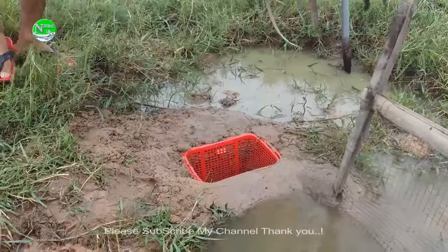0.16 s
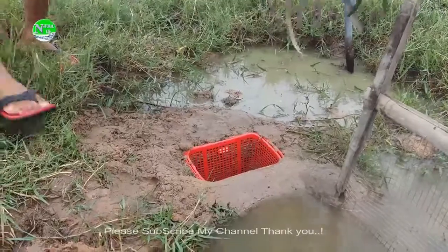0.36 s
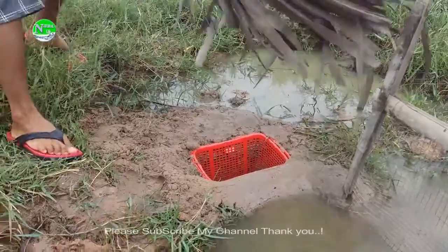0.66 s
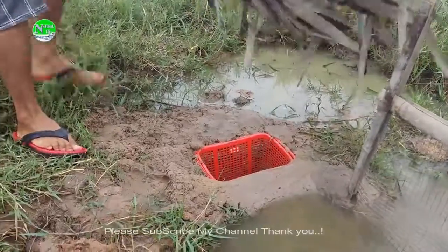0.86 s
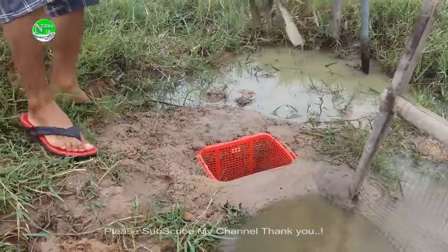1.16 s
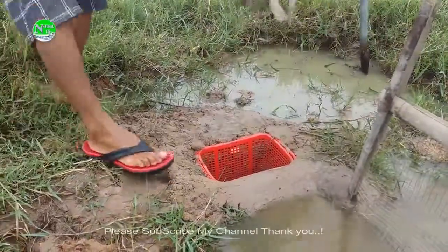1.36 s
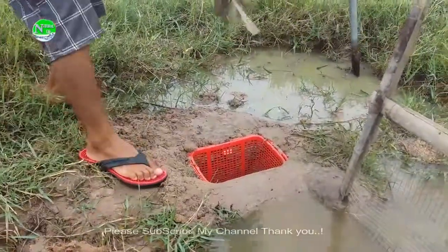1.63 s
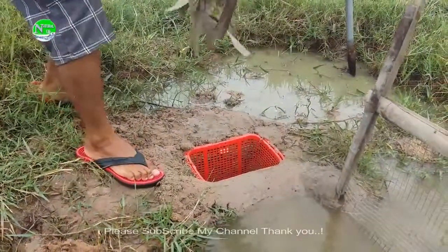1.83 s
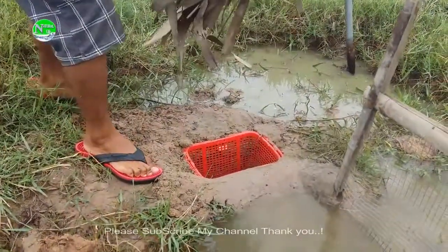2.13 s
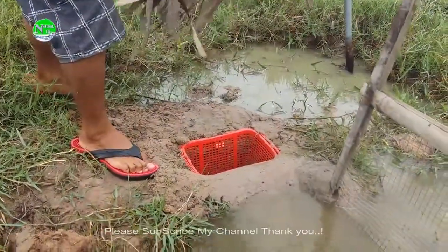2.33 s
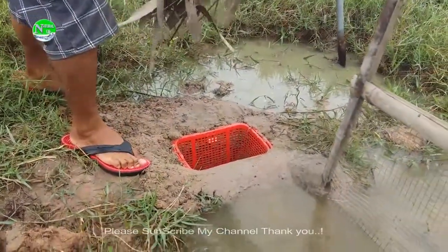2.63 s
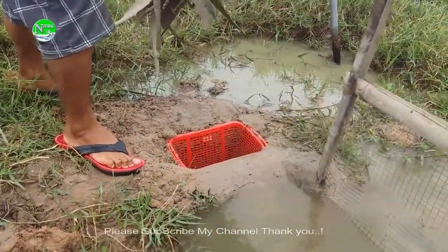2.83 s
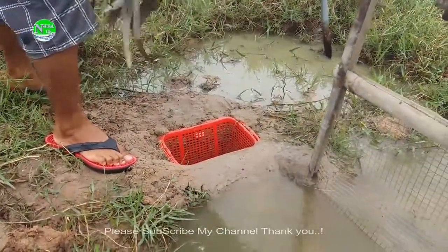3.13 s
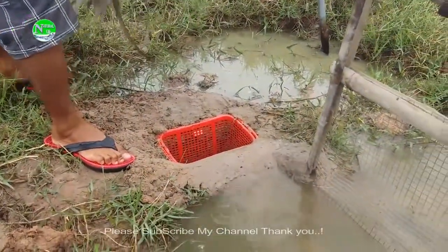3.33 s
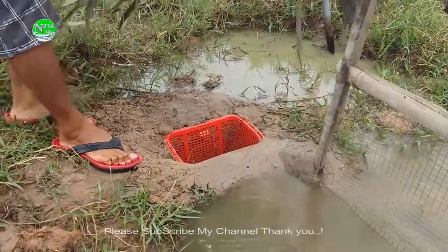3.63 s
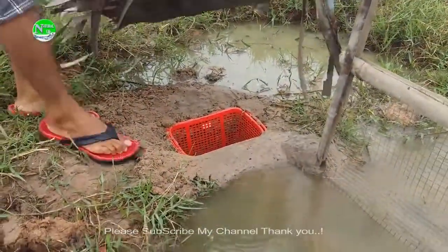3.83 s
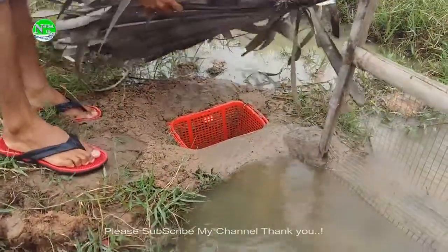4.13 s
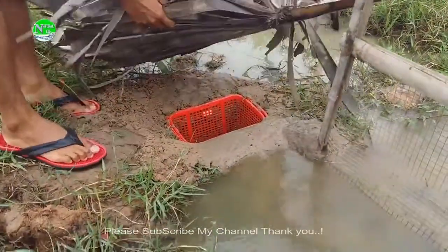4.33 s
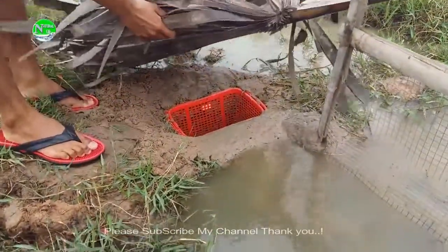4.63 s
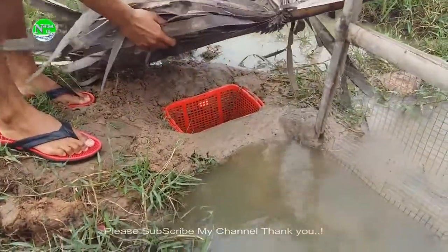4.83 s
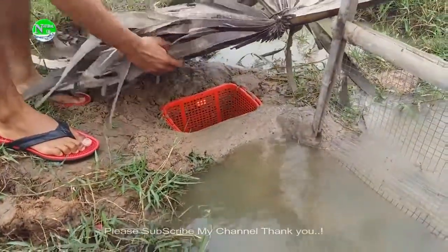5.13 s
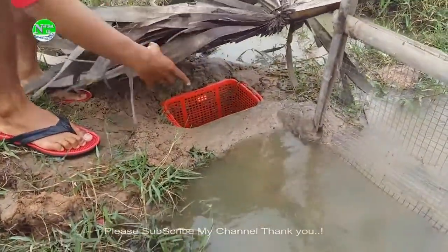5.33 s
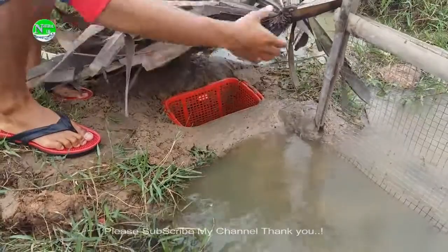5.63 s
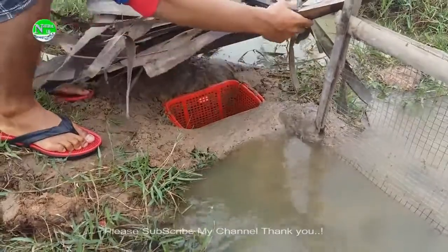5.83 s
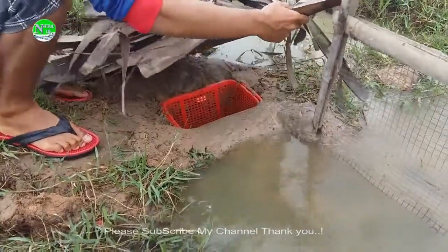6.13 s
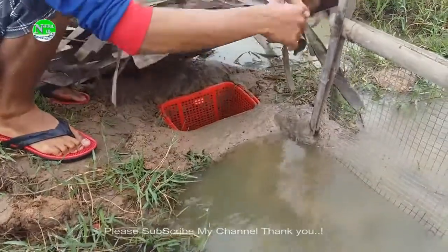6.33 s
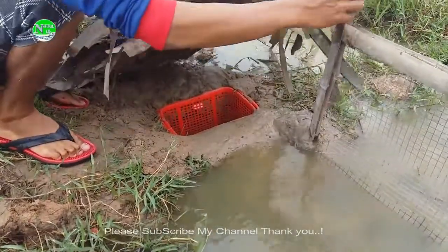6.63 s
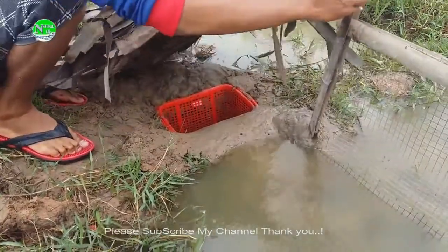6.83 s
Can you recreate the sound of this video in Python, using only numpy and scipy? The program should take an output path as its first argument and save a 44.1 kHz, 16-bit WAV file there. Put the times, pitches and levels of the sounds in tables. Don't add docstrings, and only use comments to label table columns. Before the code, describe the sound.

Close outdoor sound of stiff, dry fronds being handled by a ditch: grainy rubbing, hollow little leaflet pops, ripping fibres and needle-sharp snaps, strongest around two and a half and nearly four seconds. A few muffled footfalls come first. Later strokes grow weak and separate, revealing high cricket buzzes and quick double ticks over faint air hiss and far traffic rumble. The compact microphone sounds bright and dry, with little low weight.

```python
import sys
import numpy as np
from scipy import signal
from scipy.fft import rfft, irfft
from scipy.io import wavfile
from scipy.ndimage import uniform_filter1d

SR = 44100
rng = np.random.default_rng(int(sys.argv[2]) if len(sys.argv) > 2 else 0)


def boost(x):
    u = np.asarray(x, float) / 20
    return 10 ** u


def output_pcm(signal):
    pcm = np.clip(np.atleast_2d(signal).T, -1, 1) * 32767
    wavfile.write(sys.argv[1], SR, np.round(pcm).astype(np.int16))


N = 306936

# freq_hz, density_db_per_hz
LEAF_SPECTRUM = [(150, -83.5), (250, -10), (387, -15.5), (610, -10), (821, -12), (896, -10), (1510, -10),
                 (1680, -10.5), (1840, -10), (3210, -9), (4970, -1.5), (6030, 2.5), (8410, -14),
                 (15000, -25), (16450, -32)]
# time_s, level_db, hiss_re_level_db
CARRY_FRICTION = [(0, -50.5, -12), (.33, -51, -12), (.7, -41.5, -14), (1.13, -43, -10), (1.31, -48, -22),
                  (1.5, -41, -5), (1.78, -39.5, -31), (2.2, -41, -3.5), (2.56, -41, -14), (2.68, -52, -25),
                  (3.1, -45, -28), (3.3, -40, -19), (3.85, -44, -9), (4.08, -40.5, -5.5), (4.5, -51, -35),
                  (5.4, -47, -24), (5.6, -54.5, -50), (6.96, -53.5, -36)]
# start_s, hold_s, level_db, breadth_db (a crushing grip is both deeper and finer)
HAND_STROKES = [(0.374, 0.02, -45, -0.5), (0.412, 0.26, -38.5, 0.5), (1.38, 0.023, -35.5, 3.5),
                (1.441, 0.024, -36, 4.5), (1.535, 0.038, -30.5, -2.5), (1.624, 0.03, -34, -3),
                (1.958, 0.04, -36, -3), (2.2, 0.02, -40, -16), (2.226, 0.0055, -46, 0.5),
                (2.365, 0.011, -45.5, -0.5), (3.783, 0.022, -42, -4), (2.155, 0.053, -37.5, -4.5),
                (2.585, 0.051, -47, 0.5), (2.76, .02, -47.5, -3), (2.869, 0.014, -31.5, -2.5),
                (3.032, 0.025, -43, -4.5), (3.163, 0.046, -39, 2.5), (3.41, 0.034, -44.5, 2),
                (3.94, 0.016, -37.5, -5), (4.527, 0.021, -40, 1), (4.768, 0.035, -48.5, 4),
                (4.987, .13, -52, 4), (5.127, 0.01, -44, 6.5), (5.322, 0.023, -42.5, -5.5),
                (5.455, 0.0061, -39, -8.5), (5.937, 0.14, -44.5, -3.5), (6.071, 0.055, -42, -5.5),
                (6.275, 0.016, -47.5, -4), (6.446, 0.066, -47, -3), (6.75, 0.015, -69, 0),
                (6.857, 0.019, -56.5, -1)]
# time_s, left_re_right_db
FROND_PAN = [(0.0, -6), (1.2, -5.5), (3.43, -5.5), (3.91, -3.5), (4.11, -6.5), (5.18, -6.5), (5.23, -4.5),
             (5.7, -8.5), (5.95, -4.5), (6.34, -8), (6.4, -4), (6.59, -7), (6.77, -5), (6.96, -7)]
# time_s, cancelled_share (0-1)
MUD_DIP = [(0, 0.35), (1.8, 0.28), (2.0, 0), (2.6, 0.04), (2.7, 0.4), (3.2, 0), (6.96, 0.04)]
# click_s, peak_db, ring_hz, body_re_peak_db
CLEAN_BREAKS = [(.589, -16.5, 5800, -25), (1.2934, -23, 6340, -10.5), (1.702, -26, 5910, -7),
                (2.5279, -7, 5700, -21), (2.4371, -12.5, 5860, -27), (2.5159, -8.5, 6700, -45),
                (2.7801, -29.5, 6460, -12), (2.8841, -26, 5850, -14), (2.992, -24.5, 5800, -11.5),
                (3.3726, -19.5, 5720, -11), (3.6992, -13.5, 6260, -18), (3.7288, -8.5, 6850, -30),
                (3.8129, -12, 6500, -22), (3.884, -17.5, 6440, -24), (3.9016, -26, 6230, -29),
                (3.915, -9.5, 6530, -23), (3.936, -34, 6100, -26), (3.951, -13, 3900, -14),
                (4.0635, -16.5, 4640, -25), (5.105, -38.5, 3560, 7), (5.1252, -18, 5400, -29),
                (5.2855, -13, 6130, -48), (5.6059, -26, 6500, -5.5), (5.6664, -28, 7400, -10),
                (5.9968, -22, 5700, -11), (6.0116, -21.5, 5800, -13), (6.18, -30, 5600, -9.5),
                (3.9886, -12, 6700, -18.5), (4.0506, -18, 6160, -17), (3.5627, -22, 5670, -36),
                (3.8314, -13, 6340, -21)]
# click_s, peak_db
SMALL_CRACKS = [(1.968, -24), (1.9868, -23), (1.9927, -22), (2.0025, -27), (2.0712, -21), (2.072, -24),
                (2.1055, -16), (2.1087, -17), (2.1583, -15), (2.1614, -13), (2.1608, -16), (2.1632, -7),
                (2.1658, -11), (2.169, -13), (2.1716, -15), (2.2104, -22), (2.2139, -24), (2.219, -22),
                (2.3229, -23), (2.4428, -18), (2.4553, -21.5), (2.4903, -26), (2.5293, -16), (2.5314, -22),
                (2.5934, -24), (2.8675, -22), (2.8902, -21), (2.918, -23), (3.0416, -30), (3.2633, -25.5),
                (3.3767, -18.5), (3.4474, -27), (3.4495, -23), (3.455, -27), (3.8334, -14.5), (3.8353, -21),
                (3.9438, -29), (4.048, -23), (5.0575, -40), (5.5545, -38), (5.565, -40), (5.618, -33.5),
                (5.6422, -32), (5.9468, -28), (6.433, -36), (6.471, -32), (6.494, -31), (6.558, -37)]
# click_s, peak_db, ring_hz, body_re_peak_db
LONG_TEARS = [(.4063, -23.5, 5650, -36), (.4609, -26, 5700, -3), (1.2246, -29, 5960, -4.5),
              (1.3484, -30, 6300, 6.5), (1.8845, -24, 5960, -8), (1.9598, -20, 5800, -17),
              (1.9838, -21, 5550, -11), (2.021, -22, 6000, -34), (2.0447, -23.5, 6360, -32),
              (2.0689, -15.5, 6140, -45), (2.1024, -17, 5900, -18.5), (2.159, -14, 5670, -21),
              (2.1916, -32, 6100, -1), (2.2795, -25, 6200, -12), (2.304, -23, 6350, -25),
              (2.583, -17.5, 6900, -17), (2.6295, -22, 4800, -8), (2.7563, -25, 5240, -8.5),
              (2.8593, -24, 5100, -29), (2.8712, -15.5, 5240, -12.5), (2.9216, -17.5, 4960, -11),
              (3.0394, -33.5, 6440, 1), (3.258, -32, 5800, 1), (6.085, -27, 5900, -14),
              (6.447, -29.5, 6250, -38), (6.848, -49, 6100, 11.5)]
# click_s, peak_db, ring_hz, body_re_peak_db
RAGGED_SPLITS = [(.0388, -40.5, 4200, 6.5), (.1569, -28.5, 6740, -28), (1.405, -20, 6440, -31),
                 (2.146, -21, 5500, -26), (2.1644, -24, 5800, -7), (2.3517, -34, 6340, -4),
                 (3.4384, -17, 5250, -13), (3.384, -22.5, 5750, -23), (3.453, -21.5, 4620, -7),
                 (3.54, -27, 5800, -25), (3.835, -19, 6460, -18), (3.98, -24, 7200, -18),
                 (4.0168, -17.5, 6300, -27), (4.0733, -21.5, 6130, -28), (5.4184, -32.5, 5660, -5),
                 (5.483, -31.5, 5460, -3), (5.773, -44, 5400, -25), (5.95, -16.5, 3900, -25),
                 (6.2473, -38.5, 6130, -24), (6.639, -40, 5930, -25), (6.762, -30, 3850, -17)]
# t60_s, level_re_click_db
BREAK_TAIL = (.03, -25)
# t60_s, level_re_click_db
TEAR_TAIL = (0.051, 0.5)
# t60_s, level_re_click_db
SPLIT_TAIL = (0.023, -13.5)
# start_s, peak_db, ring_hz
LEAFLET_POPS = [(1.095, -27.5, 1810), (1.224, -29, 2190), (1.292, -31, 2190), (1.349, -21.5, 1580),
                (1.451, -17, 1980), (1.599, -29, 2120), (1.916, -27, 1600), (1.953, -20, 2440),
                (2.047, -23, 1810), (2.16, -20.5, 2710), (2.281, -29.5, 1070), (2.351, -22, 2680),
                (2.436, -32, 970), (2.527, -36, 580), (2.584, -27, 1830), (2.629, -27, 2200),
                (2.756, -34, 1170), (2.87, -24, 1810), (2.919, -22.5, 1040), (3.039, -25, 2440),
                (3.111, -35.5, 860), (3.16, -30, 1600), (3.195, -23.5, 1790), (3.31, -30, 2620),
                (3.372, -35, 2200), (3.437, -24.5, 1460), (3.914, -30, 2850), (3.95, -24, 2760),
                (4.046, -33, 1480), (5.603, -28.5, 2540)]
# start_s, peak_db, ring_hz
SOIL_TREADS = [
    (0.449, -33, 557),
    (.55, -40, 900),
    (.655, -29, 810),
    (.68, -31, 660),
    (.705, -35, 557),
    (.775, -33, 566),
    (.828, -30, 532),
    (.945, -36, 620),
    (5.885, -44, 666),
]
# start_s, length_s, end_level_db, pitch_hz
CRICKET_BUZZES = [
    (2.62, .14, -57.5, 7950),
    (3.29, .08, -53, 8000),
    (4.73, .123, -55.5, 8050),
    (4.96, .16, -58, 8000),
    (5.3, .13, -57.5, 8000),
    (5.585, .175, -57, 8000),
    (6.61, .15, -60, 7700),
    (6.87, .09, -59.5, 7700),
]
# start_s, peak_db, pitch_ratio
CRICKET_TICKS = [
    (4.2322, -27.5, 0.98),
    (4.6198, -27, 0.99),
    (4.9229, -27.5, 0.97),
    (5.457, -31, 0.96),
    (5.689, -31, 1),
    (6.287, -30.5, 0.94),
    (6.527, -31.5, 0.94),
]
# time_ms, pitch_hz, level_db
TICK_STROKE = [(0, 5900, -20), (.3, 6300, -3), (1.1, 7900, -6), (3.1, 6200, 0), (5.3, 7900, -5),
               (6.6, 7500, -4), (8.6, 8000, -10), (10, 8000, -30)]
# time_ms, pitch_hz, level_db
LEAD_STROKE = [(0, 5700, -14), (.3, 6200, -2), (.9, 7500, 0), (1.9, 8000, -3), (2.9, 8200, -22)]
# freq_hz, density_db_per_hz
TRAFFIC_SPECTRUM = [(12, -26), (20, -23), (27, -48), (39, -34), (49, -5.5), (70, -0.5), (97, -1.5),
                    (129, 0.5), (201, -5), (244, -11.5), (450, -25), (580, -42), (990, -120)]
# time_s, level_db
TRAFFIC_LEVEL = [(0.0, -42), (0.17, -48.5), (1.9, -46.5), (3.91, -47.5), (4.17, -43.5), (4.44, -47.5),
                 (6.96, -47)]
# freq_hz, density_db_per_hz
AIR_SPECTRUM = [(150, -24), (250, 2.5), (469, -8), (632, -2.5), (1600, -9), (2230, -4), (4400, -13),
                (6030, -9.5), (14500, -37), (16300, -53)]
# freq_hz, left_re_right_db
PORT_COLOUR = [(60, -1.5), (110, 0), (200, -1), (380, -1), (700, -0.5), (1290, -3), (2380, 0), (4400, 1),
               (8120, 2), (15000, 1.5)]

BODY_TOP_HZ, HISS_BOTTOM_HZ = 3200, 9000
RISE_DB_PER_S, FALL_DB_PER_S = 709, 311
STROKE_HISS_DB, HISS_PER_BREADTH = -22, 2.6
CARRY_BODY_DB = -2.5
DIP_HZ, DIP_WIDTH_HZ = 3900, 1400
PAN_TRIM_DB = 2.0
CRACK_HZ, CRACK_BODY_DB = 5900, -22
BREAK_HISS_DB, HISS_PER_BODY = -21, 0.2
POP_SHARPNESS, TREAD_SHARPNESS = 6.0, 2.5
BUZZ_WIDTH_HZ, TEETH_PER_S, BUZZ_SWELL_DB = 800, 195, 4
LEAD_S, LEAD_GAP_S, LEAD_DB = 0.0217, 0.0058, -6
AIR_DB = -56.5
CONVERTER_OFFSET = -0.0007


def rubbing(per_s, spread_db, clump_db, patchy_db, sharpness, lag_spread):
    size = boost(spread_db * np.minimum(rng.exponential(1, N), 4)) * rng.choice([-1, 1], N)
    slips = size * boost(clump_db * drift(33.0)) * (rng.random(N) < per_s / SR)
    pitches_hz = np.geomspace(330, 16000, 52)
    dealt = rng.integers(0, 52, N)
    lag_samples = (1.7 + lag_spread * drift(4.0)).astype(int)
    out = np.zeros((2, N))
    for k, offset in enumerate(rng.integers(0, N, 52)):
        hz = pitches_hz[k]
        width_hz = hz ** 1.172 / sharpness
        patch = ring(slips * (dealt == k), hz, width_hz) * boost(patchy_db * drift(8.8))
        out[0] += patch.take(np.arange(N) - np.roll(lag_samples, offset), mode="clip")
        out[1] += patch
    edges, body, hiss = three_ways(port_peak(colour(out, LEAF_SPECTRUM)))
    edges_gain, body_gain, hiss_gain = effort()
    dip = np.clip(in_time(MUD_DIP)[0], 0, 1)
    edges = edges - dip * ring(edges, DIP_HZ, DIP_WIDTH_HZ)
    body = body - dip * ring(body, DIP_HZ, DIP_WIDTH_HZ)
    pan = boost(np.outer([0.5, -0.5], in_time(FROND_PAN)[0] + PAN_TRIM_DB))
    upper = edges_gain * evened(edges, 0.11) * pan
    lower = boost(-2.0) * body_gain * evened(body, 0.5)
    return upper + lower + boost(-8.0) * hiss_gain * evened(hiss, 0.05)


def effort():
    t = np.arange(N) / SR
    db, hiss_db = in_time(CARRY_FRICTION)
    power = boost(2 * np.array([db, db + CARRY_BODY_DB, db + hiss_db]))
    for s, hold, level_db, breadth_db in HAND_STROKES:
        near = slice(max(int((s - 0.1) * SR), 0), int((s + hold + 0.3) * SR))
        rise_db = -RISE_DB_PER_S * np.maximum(s - t[near], 0)
        fall_db = -FALL_DB_PER_S * np.maximum(t[near] - s - hold, 0)
        layers_db = np.array([[0], [breadth_db], [STROKE_HISS_DB + HISS_PER_BREADTH * breadth_db]])
        power[:, near] += boost(2 * (level_db + layers_db + rise_db + fall_db))
    return np.sqrt(power)


def snaps(size=1800, lead=60):
    out = np.zeros((2, N + size))
    t = (np.arange(size) - lead) / SR
    pan_db = in_time(FROND_PAN)[0]
    small = [row + (CRACK_HZ, CRACK_BODY_DB) for row in SMALL_CRACKS]
    kinds = [(CLEAN_BREAKS + small, BREAK_TAIL), (LONG_TEARS, TEAR_TAIL), (RAGGED_SPLITS, SPLIT_TAIL)]
    for s, db, hz, body_db, t60, cracks_db in [row + tail for rows, tail in kinds for row in rows]:
        cracks = pair(0.65, size) * boost(4 * rng.standard_normal(size).clip(-2, 2))
        cracks = cracks * (rng.random(size) < 0.3)
        strain = np.exp(np.minimum(t, 0) / 0.0008)
        decay = boost(-60 * np.maximum(t, 0) / np.clip(t60, 0.003, 0.08))
        burst = boost(cracks_db) * cracks * strain * decay
        burst[0, lead + rng.integers(-1, 3)] += 1
        burst[1, lead] += 1
        ring_db = 3.0 + 12.0 * np.log(max(6000 / hz, 1))
        burst = burst + boost(ring_db) * ring(burst, hz, 650.0)
        parts = three_ways(port_peak(colour(burst, LEAF_SPECTRUM, size=1024)))
        edges, body, hiss = [p / (0.5 * np.abs(p).max() + 0.26 * np.abs(p[0] + p[1]).max()) for p in parts]
        i = round(s * SR)
        pan = boost(np.array([[0.5], [-0.5]]) * (pan_db[i] + PAN_TRIM_DB))
        hiss_db = BREAK_HISS_DB + HISS_PER_BODY * (np.clip(body_db, -45, -20) + 20)
        sound = edges * pan + boost(body_db + 4) * body + boost(hiss_db) * hiss
        out[:, i:i + size] += boost(db + 0.5) * rng.choice([-1, 1]) * sound
    return out[:, lead:N + lead]


def pops(size=2000):
    out = np.zeros((2, N + size))
    u = np.arange(size) / SR
    events = [row + (POP_SHARPNESS,) for row in LEAFLET_POPS]
    events += [row + (TREAD_SHARPNESS,) for row in SOIL_TREADS]
    for s, db, hz, sharpness in events:
        push = pair(0.86, size) * u * np.exp(-u / 0.0023)
        pop = ring(ring(push, hz, hz / sharpness), hz, hz / 3.1)
        i = round(s * SR)
        out[:, i:i + size] += boost(db - 5.0) * pop / np.abs(pop).max()
    return out[:, :N]


def cricket():
    out = buzzes()
    strokes = [(s, db, TICK_STROKE, pitch) for s, db, pitch in CRICKET_TICKS]
    for s, db, pitch in CRICKET_TICKS:
        for k in range(2):
            strokes.append((s - LEAD_S + k * LEAD_GAP_S, db + LEAD_DB, LEAD_STROKE, pitch))
    for s, db, shape, pitch in strokes:
        tick = whistle(shape, pitch)
        i = round(s * SR)
        out[:, i:i + tick.shape[1]] += boost(db + 1.0) * tick
    return out


def buzzes():
    out = np.zeros((2, N + SR))
    for s, length, db, hz in CRICKET_BUZZES:
        u = np.arange(int(length * SR)) / SR
        jitter = np.cumsum(rng.normal(0, 0.004, len(u))).clip(-3, 3)
        teeth = np.diff(np.floor(TEETH_PER_S * u + jitter), prepend=0)
        scrape = teeth + 0.04 * rng.standard_normal(len(u))
        wing = scrape * boost(2.5 * rng.standard_normal((2, len(u))))
        for _ in range(2):
            wing = ring(wing, hz, BUZZ_WIDTH_HZ)
        fade = np.clip(np.minimum(u, length - u) / 0.006, 0, 1)
        swell = boost(db - BUZZ_SWELL_DB * (1 - u / length)) * fade
        i = int(s * SR)
        out[:, i:i + len(u)] += swell * rms_one(wing)
    return out[:, :N]


def whistle(shape, pitch):
    ms, hz, db = np.transpose(shape)
    u_ms = np.arange(int(ms[-1] * SR / 1000)) * 1000 / SR
    phase = 2 * np.pi * np.cumsum(pitch * np.interp(u_ms, ms, hz)) / SR
    level = boost(np.interp(u_ms, ms, db) + [[-1.0], [1.0]])
    return level * np.sin(phase + rng.uniform(0, 8) - [[1.2], [0]])


def background():
    traffic = rms_one(colour(pair(0.97, N + 4096), TRAFFIC_SPECTRUM)[:, 4096:])
    traffic = boost(in_time(TRAFFIC_LEVEL)[0]) * traffic
    air = close_ports(rms_one(colour(pair(0.033, N), AIR_SPECTRUM)), corner_hz=830.0)
    band = signal.butter(4, [10000, 15600], "band", fs=SR, output="sos")
    capsules = signal.sosfilt(band, rng.standard_normal((2, N)))
    return traffic + boost(AIR_DB) * air + boost(-89.0) * rms_one(capsules)


def close_ports(x, corner_hz):
    mid, side = (x[0] + x[1]) / 2, (x[0] - x[1]) / 2
    high = signal.butter(2, corner_hz, "high", fs=SR, output="sos")
    side = 0.86 * side + 0.31 * signal.sosfilt(high, side)
    return np.array([mid + side, mid - side])


def port_peak(x):
    return x + 0.55 * ring(x, 6050, 800)


def three_ways(x):
    edges = signal.butter(4, [BODY_TOP_HZ, HISS_BOTTOM_HZ], "band", fs=SR, output="sos")
    body = signal.butter(4, 0.92 * BODY_TOP_HZ, "low", fs=SR, output="sos")
    hiss = signal.butter(4, HISS_BOTTOM_HZ, "high", fs=SR, output="sos")
    return [signal.sosfilt(part, x) for part in (edges, body, hiss)]


def evened(x, span_s):
    power = uniform_filter1d(np.mean(x ** 2, axis=0), int(span_s * SR))
    return x / np.sqrt(power + 1e-20)


def ring(x, hz, width_hz):
    r = np.exp(-np.pi * width_hz / SR)
    zeros = np.array([1, 0, -1]) * (1 - r * r) / 2
    poles = [1, -2 * r * np.cos(2 * np.pi * hz / SR), r * r]
    return signal.lfilter(zeros, poles, x + 1e-18)


def colour(x, points, size=8192):
    hz, db = np.transpose(points)
    grid_hz = np.maximum(np.fft.rfftfreq(size, 1 / SR), 1)
    cepstrum = irfft(np.interp(np.log(grid_hz), np.log(hz), db) * np.log(10) / 20)
    cepstrum[1:size // 2] *= 2
    cepstrum[size // 2 + 1:] = 0
    kernel = irfft(np.exp(rfft(cepstrum)))[None, :size // 2]
    return signal.oaconvolve(x, kernel, axes=1)[:, :x.shape[1]]


def pair(alike, size):
    mid, side = rng.standard_normal((2, size))
    return np.sqrt(1 + alike) * mid + np.sqrt(1 - alike) * side * [[1], [-1]]


def drift(rate_hz):
    r = np.exp(-40 * np.pi * rate_hz / SR)
    noise = rng.standard_normal(N // 20 + 2002)
    slow = signal.lfilter([1], [1, -2 * r, r * r], noise)[2000:]
    return np.interp(np.arange(N) / 20, np.arange(len(slow)), rms_one(slow))


def in_time(rows):
    s, *columns = np.transpose(rows)
    return [np.interp(np.arange(N) / SR, s, c) for c in columns]


def rms_one(x):
    return x / np.sqrt(np.mean(x ** 2) + 1e-20)


def scene():
    rub = rubbing(per_s=14000.0, spread_db=-0.5, clump_db=2.0, patchy_db=2.0, sharpness=57.0, lag_spread=4.5)
    fronds = close_ports(rub + snaps() + pops(), corner_hz=860.0)
    return fronds + cricket() + background()


def band_limit(x):
    return signal.sosfilt(signal.butter(12, 16490, fs=SR, output="sos"), x)


def record(dry):
    hz, db = np.transpose(PORT_COLOUR)
    left = colour(dry[[0]], np.transpose([hz, 0.5 * db]), size=512)[0]
    right = colour(dry[[1]], np.transpose([hz, -0.5 * db]), size=512)[0]
    top_cut = signal.cheby2(10, 50, 16950, fs=SR, output="sos")
    mix = signal.sosfilt(top_cut, [left, right]) + CONVERTER_OFFSET
    return band_limit(mix)


dry = scene()
out = record(dry)
output_pcm(out)
```